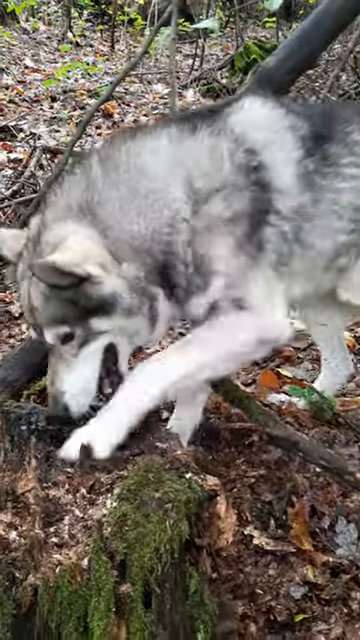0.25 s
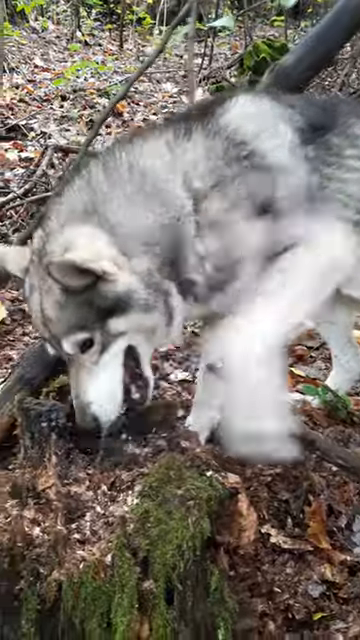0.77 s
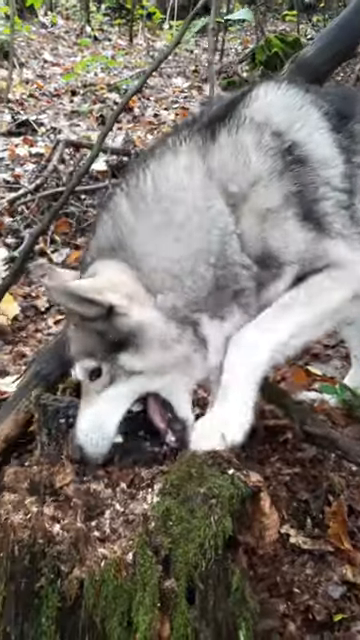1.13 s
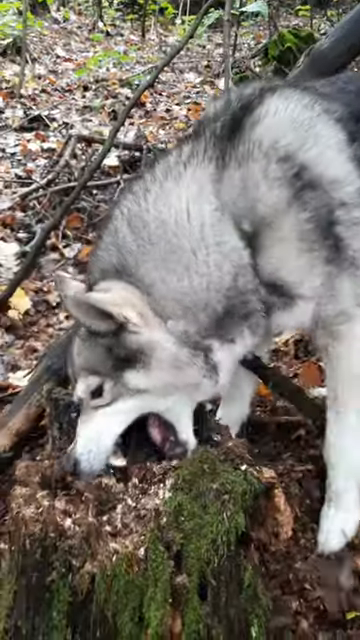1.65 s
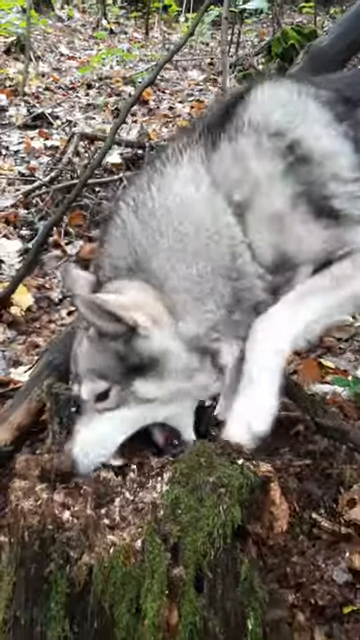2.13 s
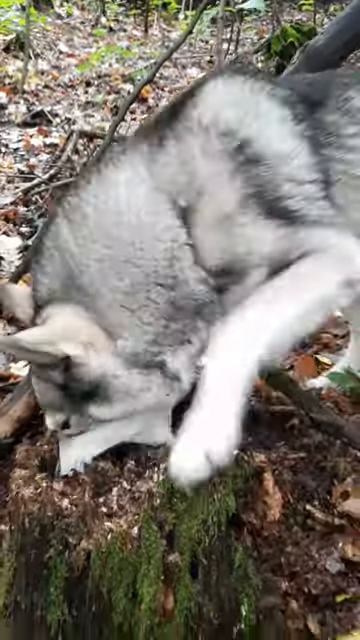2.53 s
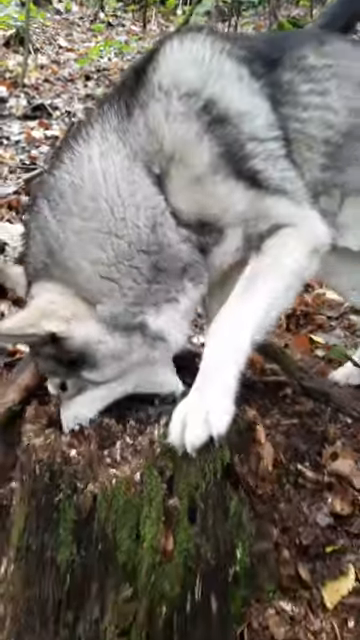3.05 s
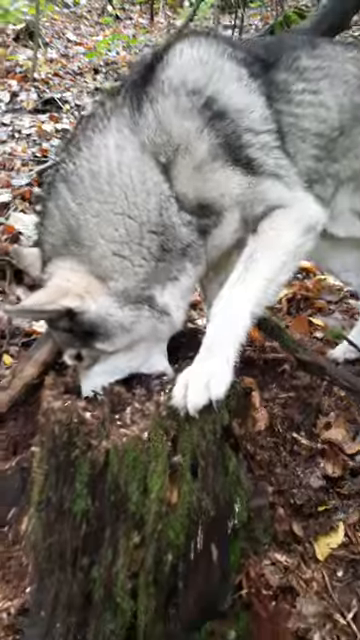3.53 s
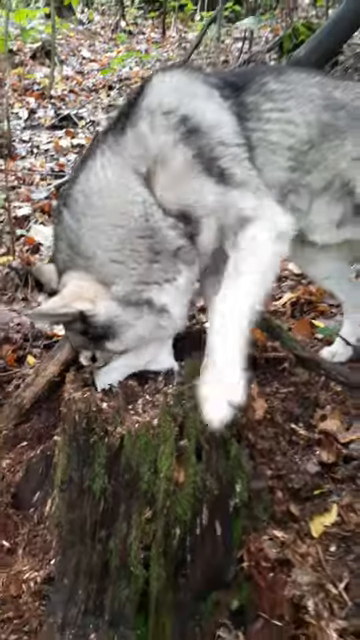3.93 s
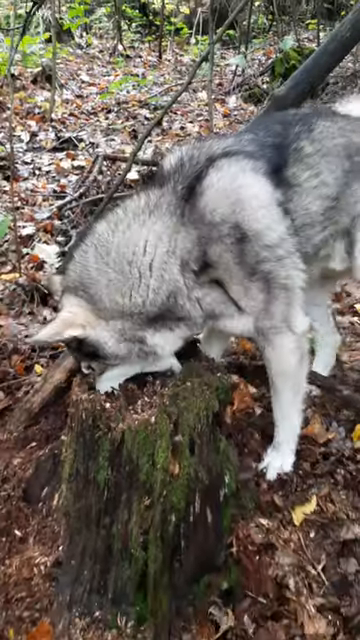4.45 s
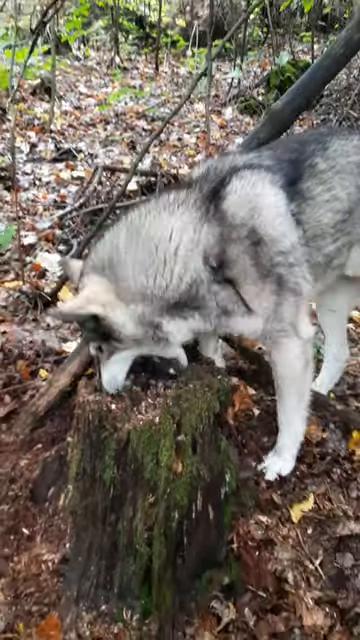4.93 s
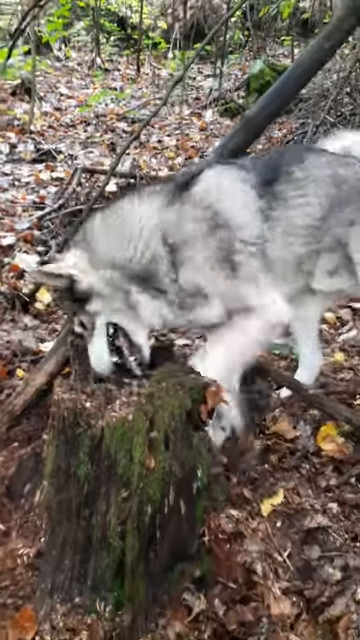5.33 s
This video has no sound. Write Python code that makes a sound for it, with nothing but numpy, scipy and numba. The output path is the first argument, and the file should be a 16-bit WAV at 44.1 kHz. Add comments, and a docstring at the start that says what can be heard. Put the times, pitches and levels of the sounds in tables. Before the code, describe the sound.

Outdoors, with a faint airy background and little reverberation, a dog snuffles near the microphone. Splintering wood snaps early, a tiny piercing yip follows, then breathy snorts with soft intakes and a thin whine. Digging resumes with scratches, a low rub, dull thuds on soft wood and dry leaf crumbs, ending in low hoarse grunts, wet splutters and light sniffs.

```python
"""Quiet woodland, close by: a dog gnaws and paws at a rotten stump.
It sniffs and snorts (turbulent noise through nose and mouth resonances), drawing air back in after each puff.
It yips once, whines and grunts twice (harmonics through a throat); a thin, high whistle is a second oscillator.
Wood fibres crack as damped noise bursts, crumbs trickle on dry leaves as random grains,
and the paws thud on the soft stump as short low bumps and rub it in one low resonance."""
import sys
import numpy as np
from scipy import signal
from scipy.fft import rfft, irfft, next_fast_len
from scipy.io import wavfile
from scipy.ndimage import uniform_filter1d
from numba import njit

SR = 44100
rng = np.random.default_rng(int(sys.argv[2]) if len(sys.argv) > 2 else 0)


def waveform_to_disk(signal):
    """Save audio, clipped to [-1, 1], as 16-bit WAV at the path in sys.argv[1]."""
    frames = np.transpose(np.atleast_2d(signal))
    scaled = np.clip(frames, -1, 1) * 32767
    samples = np.round(scaled).astype(np.int16)
    wavfile.write(sys.argv[1], SR, samples)


N = 246519
TIME = np.arange(N) / SR

# balance of the digging between the ears: (time [s], left over right [dB])
DIG_PAN = [(0.8, 3), (3.5, -5.5), (4.5, 1)]
# glides of the voice, which also shake the whistle: (time [s], pitch [Hz], level [dB])
YIP = [(1.445, 390, -64), (1.474, 520, -45), (1.485, 685, -18.5), (1.507, 757, -9), (1.526, 812, -11),
       (1.538, 930, -37)]
WHINE = [(2.625, 767, -63), (2.665, 697, -60), (2.733, 1002, -60), (2.765, 1010, -40.5),
         (2.812, 1055, -51.5), (2.843, 1005, -34), (2.89, 1031, -39.5), (2.94, 922, -27.5),
         (2.98, 949, -33)]


def from_db(db):
    """Level to amplitude: 20 dB is a factor of ten."""
    return 10 ** (np.asarray(db) / 20)


def rms_one(x):
    """Normalisation of the mean power to one."""
    return x / np.sqrt(np.mean(x ** 2) + 1e-20)


def evened(x):
    """Power normalisation over a sliding 50 ms window, so that a noise stays at unit rms."""
    return x / np.sqrt(uniform_filter1d(x ** 2, size=SR // 20) + 1e-20)


def in_time(rows):
    """Linear interpolation of the columns of a curve at every sample."""
    s, *columns = np.transpose(rows)
    return [np.interp(TIME, s, c) for c in columns]


def cut(x, hz, kind, order=2):
    """Band limiting by a maximally flat (Butterworth) filter."""
    sos = signal.butter(order, np.clip(hz, 10, .45 * SR), kind, fs=SR, output="sos")
    return signal.sosfilt(sos, x + 1e-18)


def coloured(x, spectrum):
    """Spectral shaping: x times a gain drawn over log frequency, falling 6 dB/octave below it; rms 1."""
    hz, db = np.transpose(spectrum)
    size = next_fast_len(N + SR // 10)
    bins = np.maximum(np.fft.rfftfreq(size, 1 / SR), 1)
    gain = from_db(np.interp(np.log(bins), np.log(hz), db)) * np.minimum(bins / hz[0], 1)
    return rms_one(irfft(rfft(x, size) * gain, size)[..., :N])


def drift(rate):
    """Band-limited random fluctuation of rms 1: random values, 2 * rate a second, joined by lines."""
    steps = np.clip(TIME * 2 * rate, 0, N - 1)
    return rms_one(np.interp(steps, np.arange(N), rng.standard_normal(N)))


def resonate(x, hz, width_hz):
    """A damped resonator: a pole pair whose radius sets the bandwidth; gain about 1 on top."""
    r = np.exp(-np.pi * width_hz / SR)
    zeros = np.array([1, 0, -1]) * (1 - r * r) / 2
    return signal.lfilter(zeros, [1, -2 * r * np.cos(2 * np.pi * hz / SR), r * r], x)


@njit
def glide(x, hz, width_hz):
    """The same damped resonator with a moving centre frequency."""
    r, out = np.exp(-np.pi * width_hz / SR), np.zeros(len(x))
    for i in range(2, len(x)):
        drive = (1 - r * r) / 2 * (x[i] - x[i - 2])
        out[i] = drive + 2 * r * np.cos(2 * np.pi * hz[i] / SR) * out[i - 1] - r * r * out[i - 2]
    return out


def panned(x, pan_db):
    """Interaural level difference: pan_db is left over right."""
    return np.array([x * from_db(pan_db / 2), x * from_db(-pan_db / 2)])


def add(track, sound, s):
    """Superposition of a short sound from time s on."""
    at = max(round(s * SR), 0)
    track[..., at:at + sound.shape[-1]] += sound[..., :N - at]


def swell(start, length, top_share, fall_power=1):
    """A sine-arch envelope that rises to one top and falls away, sooner for a higher power."""
    top = start + length * np.clip(top_share, 0, 1)
    arch = np.sin(np.pi / 2 * np.interp(TIME, [start, top, start + length], [0, 1, 0]))
    return np.where(TIME < top, arch, arch ** fall_power)


def held(start, length, attack_s=0.01, release_s=0.025):
    """Steady airflow: a trapezoid envelope of attack, hold and release."""
    return np.clip(np.minimum((TIME - start) / attack_s, (start + length - TIME) / release_s), 0, 1)


def woodland(level_db=-73):
    """Diffuse background: noise partly common to both ears, so only partly correlated."""
    # spectrum of the quiet wood: (frequency [Hz], density [dB per Hz])
    spectrum = [(70, 0.5), (200, -12), (2200, -14.5), (3500, -24.5), (7500, -17.5), (10000, -31.5)]
    air = rng.standard_normal((3, N))
    return from_db(level_db) * coloured(air[2] + air[:2], spectrum)


def airflow(intake_hollow_db=-3, pause_s=0.02, splutter_s=0.0078):
    """Flow powers add: each puff out is followed by a pause and a faint, even intake."""
    # soft puffs through the muzzle: (start [s], length [s], hollow resonance [dB], rush [dB])
    sniffs = [(-.04, 0.096, -45.5, -42.5), (0.24, 0.17, -49, -47), (0.579, 0.084, -48.5, -53.5),
              (0.788, 0.17, -45, -56.5), (1.105, 0.13, -49, -55), (1.488, 0.24, -53, -42.5),
              (2.477, 0.098, -67.5, -65.5), (2.59, 0.65, -83.5, -61.5), (3.56, 0.14, -54.5, -46.5),
              (4.49, 0.2, -55, -47), (4.966, 0.077, -45, -46.5), (5.199, 0.15, -47.5, -50.5),
              (5.524, 0.093, -49, -47)]
    # hard snorts that clear the nose: (start [s], rush [dB], length of the intake after it [s], intake [dB])
    snorts = [(1.626, -31.5, 0.23, -70.5), (2.126, -31.5, 0.18, -60.5), (2.994, -28.5, 0.16, -55.5),
              (4.093, -35.5, 0.44, -60), (4.593, -40, 0.13, -62.5), (4.906, -35, 0.056, -57)]
    # wet splutters, where moist tissue parts in the stream: (start [s], rush [dB])
    splutters = [(2.419, -55), (4.487, -38), (4.5, -38), (4.528, -31.5), (4.954, -35)]
    hollow_top, nose_sag = 0.49, 0.1   # shares: the nose rings most mid-puff; its pitch sinks by a tenth
    snort_s, snort_hollow_db = 0.11, -10   # length of every snort; its hollow relative to its rush

    # after the four columns of a puff: top share of the rush, its fall power, intake [s], intake [dB]
    puffs = [(*row, 0.42, 2.2, 0.12, -68.5) for row in sniffs]
    for s, db, *intake in snorts:
        puffs.append((s, snort_s, db + snort_hollow_db, db, 0.29, 3.56, *intake))

    hollow, rush, sag = np.zeros((3, N))
    for start, length, hollow_db, rush_db, top_share, power, intake_s, intake_db in puffs:
        progress = (TIME - start) / length
        inside = (progress > 0) & (progress < 1)
        sag = np.where(inside, nose_sag * (progress - hollow_top), sag)
        intake = from_db(intake_db) * held(start + length + pause_s, intake_s)
        hollow += (from_db(hollow_db) * swell(start, length, hollow_top)) ** 2
        hollow += (from_db(intake_hollow_db) * intake) ** 2
        rush += (from_db(rush_db) * swell(start, length, top_share, power)) ** 2 + intake ** 2
    for s, db in splutters:
        rush += (from_db(db) * swell(s, splutter_s, 1 / 2)) ** 2
    return hollow, rush, sag


def snuffles(flutter_db=2.5, width_hz=420, upper_hz=2100, upper_db=5, nose_low_hz=430):
    """Turbulence excites cavities: the nose rings hollow, and the mouth shapes the rush of air."""
    # spectrum of the rush: (frequency [Hz], density [dB per Hz])
    rush_spectrum = [(100, -20), (330, -13.5), (700, 0), (2800, -5), (4300, -26), (6500, -11),
                     (9000, -31.5)]
    # jaw and lips move the lower resonance and trade it against the upper: (time [s], centre [Hz], lift [dB])
    mouth = [(1.67, 1786, 0.5), (3.05, 1490, -0.5), (4.915, 1494, -1.5), (4.955, 1504, 18.5),
             (5.25, 1630, 10)]
    # resonances of the nose: (centre [Hz], width [Hz], relative level [dB])
    nose_modes = [(546, 58, 2.5), (1010, 14, -9.5)]
    hollow, rush, sag = airflow()
    mouth_hz, lift_db = in_time(mouth)

    air = coloured(rng.standard_normal(N), rush_spectrum)
    lower = glide(glide(air, mouth_hz, width_hz), mouth_hz, width_hz)
    upper = resonate(air, upper_hz, width_hz)
    air = air + from_db(lift_db) * lower + from_db(upper_db - lift_db) * upper

    stream = cut(rng.standard_normal(N), nose_low_hz, "high")
    nose = np.zeros(N)
    for hz, nose_width_hz, db in nose_modes:
        nose += from_db(db) * glide(stream, hz * (1 - sag), nose_width_hz)

    breath = np.sqrt(hollow) * evened(nose) + np.sqrt(rush) * evened(air)
    return breath * from_db(flutter_db * drift(110))   # moist tissue flutters in the stream


def cracks(tear_s=0.00078, splinter_s=0.015, splinter_db=-27, body_width_hz=1400,
           snap_hz=6500, snap_width_hz=2200):
    """Impulsive fracture: a tearing fibre gives a bright snap, a damped ring and a short splintering."""
    # wood fibres under teeth and claws: (time [s], body level [dB], body centre [Hz], snap level [dB])
    fibres = [(0.015, -19.5, 840, -28), (0.227, -38, 1140, -45.5), (0.328, -39, 700, -30),
              (0.343, -17, 2680, -27), (0.347, -17.5, 1370, -35), (0.3652, -13, 2640, -19),
              (0.379, -12.5, 2710, -22), (0.387, -28, 2930, -29), (0.399, -23, 616, -34.5),
              (0.4163, -18, 368, -31), (0.727, -38, 2240, -37), (0.782, -27, 1000, -30),
              (0.808, -15.5, 970, -25), (3.394, -37.5, 336, -29), (3.4312, -34, 1500, -10),
              (3.686, -21.5, 1710, -24.5), (3.928, -35.5, 302, -18), (4.312, -36.5, 1420, -47),
              (4.342, -33.5, 2150, -25.5), (5.217, -48, 599, -27.5)]
    out, t = np.zeros((2, N)), TIME[:SR // 10]
    tear = t / tear_s * np.exp(1 - t / tear_s) + from_db(splinter_db) * np.exp(-t / splinter_s)
    for s, body_db, hz, snap_db in fibres:
        wood, left, right = rng.standard_normal((3, len(t))) * tear
        body = cut(resonate(wood, hz, min(body_width_hz, hz)), 3770, "low")
        body = from_db(body_db) * body / abs(body).max()
        snap = cut(np.array([left + right / 2, right + left / 2]), [4200, 12000], "band", order=1)
        snap = snap + resonate(snap, snap_hz, snap_width_hz)
        snap = from_db(snap_db) * snap / abs(snap).max()
        add(out, body + snap, s)
    return out * panned(0.93, in_time(DIG_PAN)[0])   # 0.93 trims all cracks alike


def forest(x, t60_s=0.13, level_db=-13.5, low_hz=1800, low_share=0.83):
    """Diffuse reverberation: trunks and leaves scatter back a faint, bright tail, different at each ear."""
    t = TIME[:SR * 3 // 4]
    build = 1 - np.exp(-t / 0.0032)
    tail = rng.standard_normal((2, len(t))) * from_db(-60 * t / t60_s) * build
    tail = rms_one(tail) / np.sqrt(len(t))   # unit energy
    tail = cut(tail, low_hz, "high", order=3) + low_share * tail
    return from_db(level_db) * signal.fftconvolve(x, tail, axes=1)[:, :N]


def stirring(uneven_db=1.5, attack_s=0.0011, build_s=0.03, scrape_fall=247, trickle_fall=10.5):
    """Exponential decay at two rates [dB/s]: scrapes die quickly, loosened crumbs trickle on unevenly."""
    # scrapes through crumbs and dry leaves: (start [s], length [s], level [dB], trickle level [dB])
    scrapes = [(0.362, 0.012, -40, -71), (3.257, 0.044, -58.5, -54), (3.428, 0.015, -46.5, -60),
               (3.929, 0.017, -46.5, -65), (4.323, 0.017, -50.5, -65), (5.204, 0.08, -55.5, -65)]
    power = np.zeros(N)
    for start, length, db, trickle_db in scrapes:
        since = np.maximum(TIME - start, 0)
        after = np.maximum(TIME - start - length, 0)
        scrape = np.minimum(since / attack_s, 1) * from_db(db - scrape_fall * after)
        trickle = np.minimum(since / build_s, 1) * from_db(trickle_db - trickle_fall * after)
        power += scrape ** 2 + trickle ** 2
    return np.sqrt(power) * from_db(uneven_db * drift(45))


def crumbs(hiss=0.24, contacts_per_s=1300, spread_db=3.8):
    """Granular shot noise: tiny contacts of uneven size merge with the smooth hiss of leaves rubbing."""
    # spectrum of the litter: (frequency [Hz], density [dB per Hz])
    spectrum = [(250, 5.5), (700, 0), (2100, 2), (3600, -7.5), (6700, 0), (10000, -10.5)]
    sizes = from_db(spread_db * np.minimum(rng.exponential(1, (3, N)), 5))
    sizes = sizes * rng.choice([-1, 1], (3, N))
    grains = rms_one(sizes * (rng.random((3, N)) < contacts_per_s / SR))
    # the third stream is common to both ears
    litter = coloured(grains[2] + grains[:2] + hiss * rng.standard_normal((2, N)), spectrum)
    return litter * panned(stirring(), in_time(DIG_PAN)[0])


def thuds(contact_s=0.0066, mush=0.37, pan_db=-4):
    """Heavily damped impact: soft, rotten wood gives way in one short bump with a low mushy noise."""
    # dull knocks of paws and jaw on the stump: (time [s], level [dB], frequency [Hz])
    knocks = [(0.416, -38.5, 320), (3.243, -43.5, 112), (3.433, -37, 300), (3.926, -40.5, 113),
              (3.966, -44, 70), (3.999, -38.5, 101), (4.054, -40, 69), (5.559, -44.5, 109)]
    out, t = np.zeros((2, N)), TIME[:SR // 2]
    bump = t / contact_s * np.exp(1 - t / contact_s)
    for s, db, hz in knocks:
        give = rms_one(cut(rng.standard_normal((2, len(t))), [55, hz], "band"))
        add(out, from_db(db) * (np.sin(2 * np.pi * hz * t) + mush * give) * bump, s)
    return out * panned(0.87, in_time(DIG_PAN)[0] + pan_db)   # 0.87 trims all thuds alike


def note(rows, jitter, shimmer_db):
    """Phase is the integral of frequency: pitch, phase and gain of one slightly unsteady note."""
    hz, db = in_time(rows)
    hz = hz * (1 + jitter * drift(150))
    phase = 2 * np.pi * np.cumsum(hz) / SR
    gate = uniform_filter1d(1. * (TIME > rows[0][0]) * (TIME < rows[-1][0]), size=180)
    return hz, phase, gate * from_db(db + min(abs(shimmer_db), 1) * drift(130))


def call(rows, tilt_db, even_db, jitter, breath_db, breath_build=1, top_hz=2550,
         nasal_hz=1390, nasal_width_hz=500, leak_db=-27, smear_hz=100):
    """Source and filter: vocal-fold harmonics pass the throat, and breath smears each into a narrow band."""
    # throat resonances: (centre [Hz], width [Hz], gain [dB])
    throat_modes = [(560, 31, 4), (857, 220, 2.5), (1570, 130, -3), (2155, 250, -6)]
    hz, phase, gain = note(rows, jitter, shimmer_db=60 * jitter)
    on, out = gain > gain.max() / SR, np.zeros(N)
    k = np.arange(1, 11)[:, None]   # harmonic numbers
    f = k * hz[on]

    throat = 0
    for centre, width, db in throat_modes:
        throat = throat + from_db(db) / (1 + 1j * (f * f - centre ** 2) / (f * width))
    throat = throat * (1 - 1 / (1 + 2j * (f - nasal_hz) / nasal_width_hz))   # the nose branch swallows one band

    # the shape of the folds' swing sets how strong the even harmonics are
    source = from_db(tilt_db * np.log2(k) + even_db * (k % 2 == 0))
    top = 1 / (1 + (f / top_hz) ** 20) + from_db(leak_db)
    partials = throat * source * top
    partials = partials * np.exp(1j * k * phase[on]) / np.sqrt((abs(partials) ** 2).sum(0) / 2)

    smear = cut(rng.standard_normal(f.shape) + 1j * rng.standard_normal(f.shape), smear_hz, "low")
    breath = rms_one(np.real(partials / np.sqrt(abs(partials)) * smear).sum(0))
    progress = np.linspace(0, 1, on.sum())
    breath_swell = np.sin(np.pi * progress ** 2) ** breath_build   # strongest late, as the folds let go
    out[on] = gain[on] * np.real(partials).sum(0) + from_db(breath_db) * breath * breath_swell
    return out


def voice():
    """Phonation: a pure yip, a whine that starts faint and broken, then two grunts into the wood, hoarser."""
    # the two grunts: (time [s], pitch [Hz], level [dB])
    grunt_rows = [(4.441, 324.6, -80), (4.45, 321.2, -36.5), (4.485, 375.6, -29), (4.525, 286, -46.5)]
    grumble_rows = [(4.868, 256.5, -53), (4.88, 270.3, -35), (4.901, 265.7, -29), (4.908, 228.6, -42),
                    (4.928, 189, -36)]
    yip = call(YIP, tilt_db=-5.5, even_db=-8.5, jitter=0.005, breath_db=-42.5)
    whine = call(WHINE, tilt_db=-5.5, even_db=3.5, jitter=0.0057, breath_db=-67, breath_build=0, top_hz=3480)
    grunt = call(grunt_rows, tilt_db=-4.0, even_db=13.5, jitter=0.021, breath_db=-44)
    grumble = call(grumble_rows, tilt_db=-3.5, even_db=-2, jitter=0.0184, breath_db=-44)
    return yip + whine + grunt + grumble


def whistle(yip_side_db=-2, whine_side_db=-9, waver_db=1.5, hiss_db=-13, haze=0.2, haze_hz=700):
    """Modulation: the voice shakes a high, airy oscillator into a rough second strand one voice pitch above."""
    # one table a note: (time [s], pitch [Hz], level [dB])
    notes = [
        [(1.465, 5370, -45.5), (1.476, 5670, -38), (1.5, 6120, -62.5), (1.528, 6230, -39.5), (1.57, 6060, -48),
         (1.65, 4820, -39.5)],
        [(1.977, 5400, -56), (2.04, 5380, -46), (2.1, 5330, -58)],
        [(2.485, 5370, -57.5), (2.58, 5515, -62), (2.66, 5310, -56), (2.772, 6020, -52.5), (2.83, 5940, -49),
         (2.882, 6600, -49.5), (2.96, 5630, -48.5), (3.003, 4940, -51)],
    ]
    # overtone an octave above each note: (relative level [dB])
    octaves_db = [-20, -27, -15]
    out, shaken = np.zeros(N), np.ones(N, complex)
    for rows, side_db in ((YIP, yip_side_db), (WHINE, whine_side_db)):
        _, voice_phase, voice_gain = note(rows, jitter=0, shimmer_db=0)
        strands = np.exp(1j * voice_phase) + drift(haze_hz) / 2
        shaken += from_db(side_db) * np.tanh(10 * voice_gain / voice_gain.max()) * strands

    hiss = from_db(hiss_db) * rms_one(cut(rng.standard_normal(N), [4800, 7800], "band"))
    for rows, octave_db in zip(notes, octaves_db):
        _, phase, gain = note(rows, jitter=0.007, shimmer_db=1)
        octave = from_db(octave_db) * (1 + drift(haze_hz) / 2) * np.exp(2j * phase)
        tone = np.sqrt(2) * np.imag(shaken * (np.exp(1j * phase) + octave))
        roughness = 1 + haze * drift(haze_hz)   # turbulence
        out += gain * (tone * roughness * from_db(waver_db * drift(30)) + hiss)
    return out


def rubs(width_share=0.13, top_share=0.78):
    """Friction-driven resonance: a dragged paw swells and lets go, and the soft wood rumbles low."""
    # pads drag over the stump: (start [s], length [s], level [dB], centre [Hz])
    drags = [(3.255, 0.28, -55, 305)]
    out = np.zeros(N)
    for start, length, db, hz in drags:
        rumble = resonate(rng.standard_normal(N), hz, width_share * hz)
        rumble = evened(cut(rumble, 2 * hz, "low"))
        out += from_db(db) * swell(start, length, top_share) * rumble
    return panned(out, in_time(DIG_PAN)[0])


def scene():
    """Interaural time difference: muzzle, wood and paws reach the right side a few samples later."""
    floor = woodland()
    muzzle = panned(snuffles(), 1.9) + voice() + panned(whistle(), 7.8)
    wood = cracks()
    near = muzzle + wood + thuds() + rubs()
    near[1] = np.interp(np.arange(N) - 3.3, np.arange(N), near[1])   # delay [samples]
    return near + crumbs() + forest(muzzle + wood) + floor


def record(dry):
    """Transducer response: the microphones differ in the upper middle, share a dip and lose the top."""
    lift_hz, lift_width_hz, lift_share = 2500, 720, 0.56   # the right one favours this band, the left loses it
    dry = dry + lift_share * np.array([[-1], [1]]) * resonate(dry, lift_hz, lift_width_hz)
    dipped = dry - 0.65 * resonate(dry, 9730, 2300)   # centre and width [Hz]
    return signal.sosfiltfilt(signal.butter(16, 16300, fs=SR, output="sos"), dipped)


dry = scene()
out = record(dry)
waveform_to_disk(out)
```